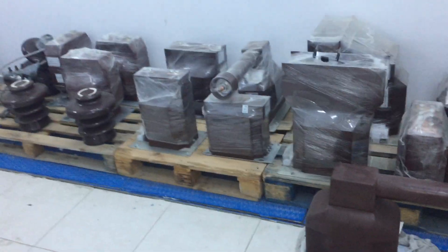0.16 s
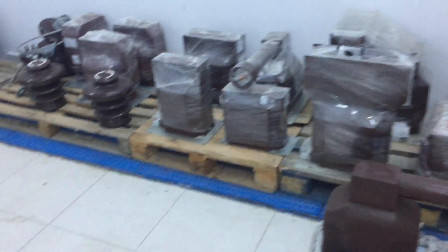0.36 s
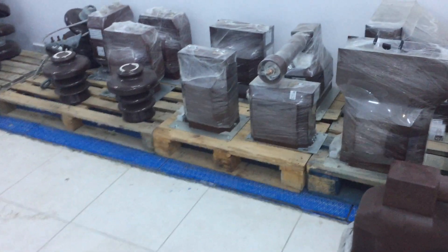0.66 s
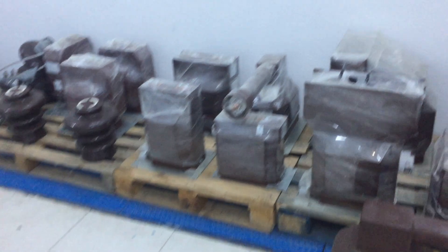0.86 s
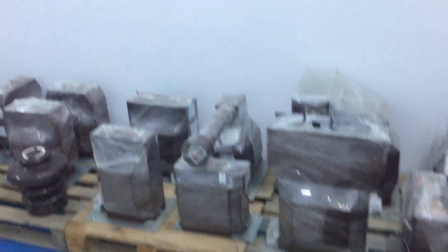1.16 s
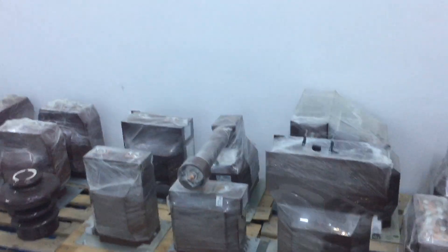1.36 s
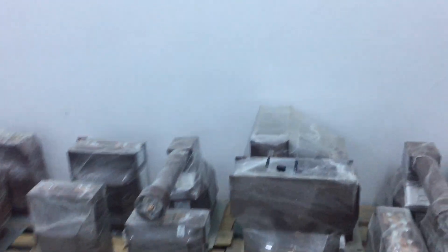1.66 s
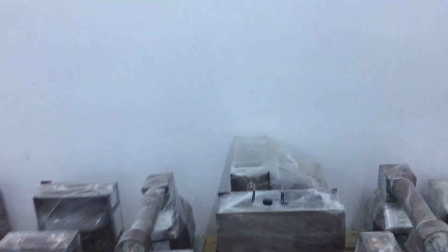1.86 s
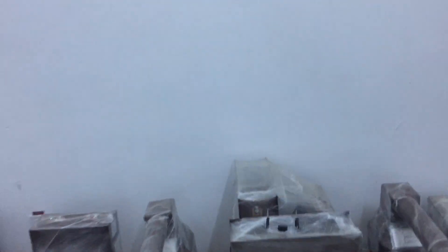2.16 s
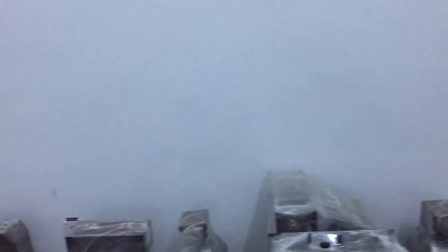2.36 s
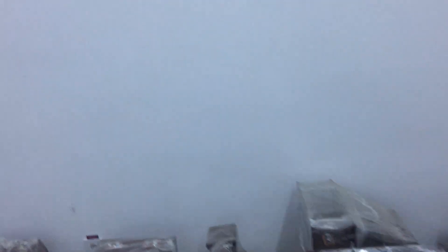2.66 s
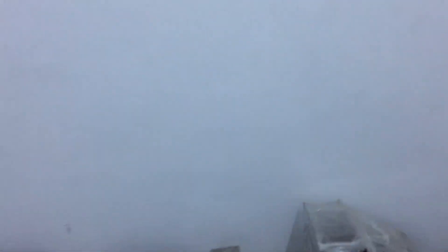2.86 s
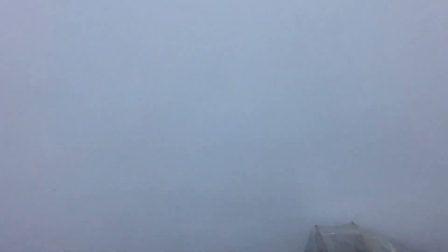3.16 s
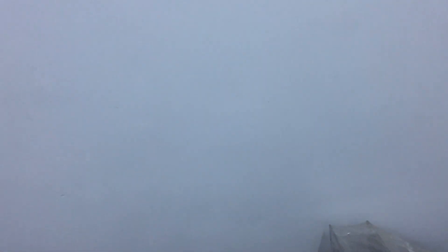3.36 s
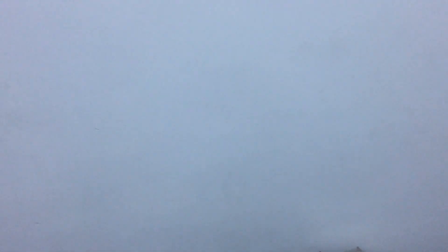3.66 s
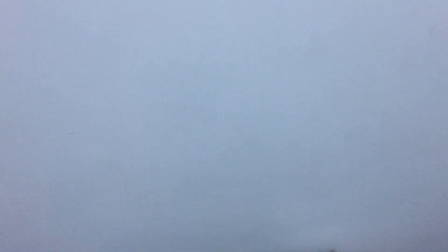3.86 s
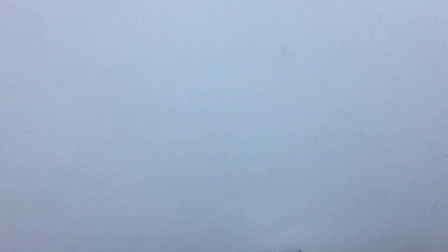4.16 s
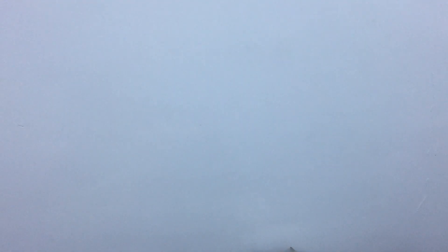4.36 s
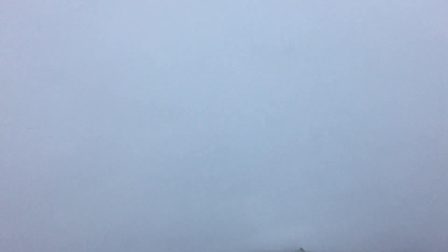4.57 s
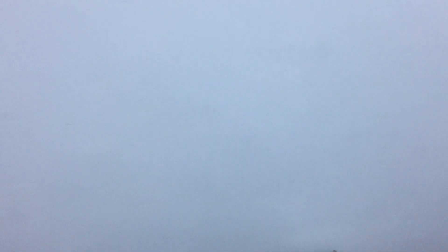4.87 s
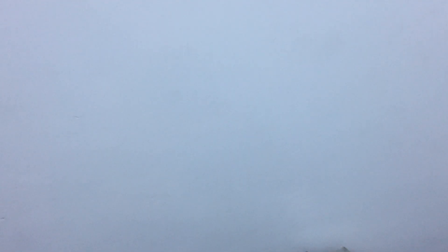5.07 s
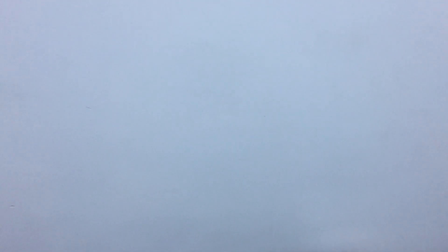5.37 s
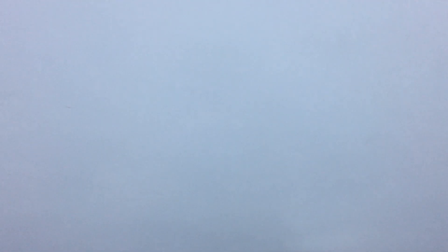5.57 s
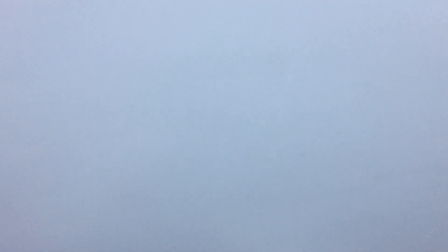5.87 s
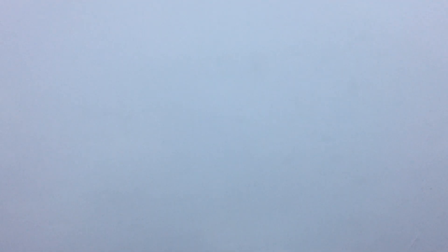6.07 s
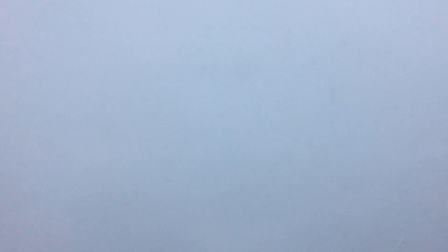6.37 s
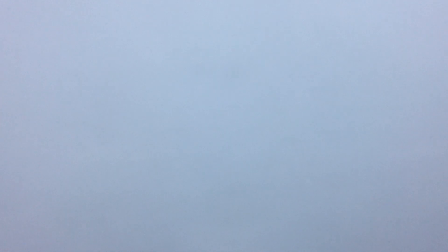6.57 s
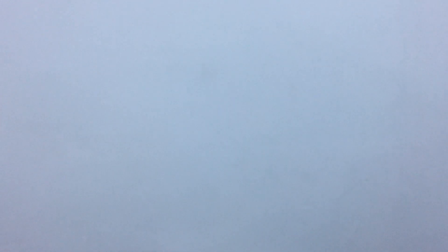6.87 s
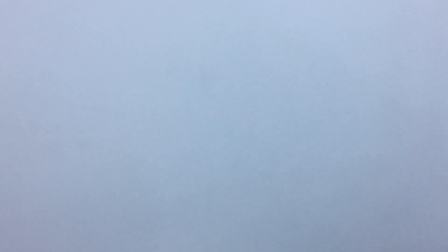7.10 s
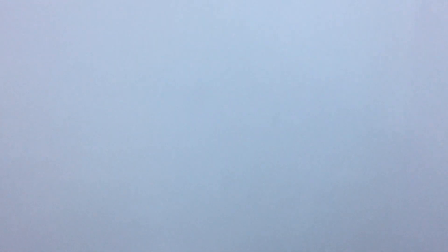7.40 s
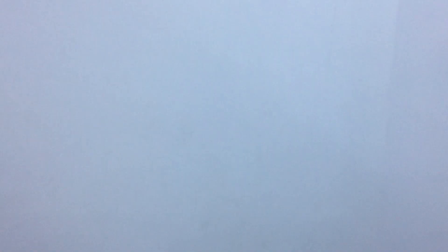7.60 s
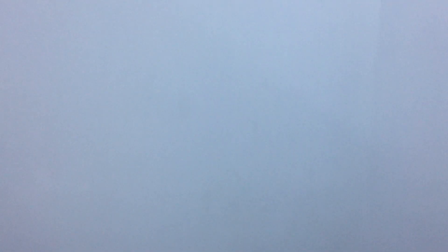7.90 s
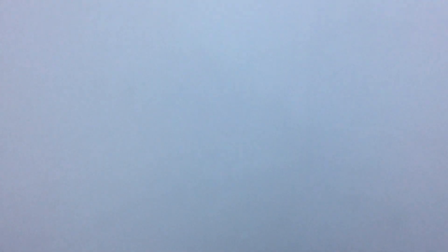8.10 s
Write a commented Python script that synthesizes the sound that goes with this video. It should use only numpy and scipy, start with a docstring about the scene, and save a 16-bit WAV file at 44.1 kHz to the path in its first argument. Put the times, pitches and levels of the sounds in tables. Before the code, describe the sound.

Steady electrical machinery hum with slowly swelling tones drones over low rumble and rushing cooling air in a bare, hard indoor room.

```python
"""A generator set turning about ten times a second hums in a bare, hard room of a power plant.
Sines at multiples of the shaft rate give its shaft orders, a 19-per-turn beat and the magnetic hum.
The hand-held microphone moves through the room's standing waves, so the tones swell and fade.
A wavering sine adds a low drone; a faint rubber squeak, noise scuffs and damped taps come from close by.
Behind them, coloured noise makes the room rumble, the rush of cooling air and a faint hiss."""
import sys
import numpy as np
from scipy import signal
from scipy.fft import rfft, irfft, next_fast_len
from scipy.io import wavfile
from scipy.ndimage import uniform_filter1d, map_coordinates

SR = 44100
rng = np.random.default_rng(int(sys.argv[2]) if len(sys.argv) > 2 else 0)


def master(y):
    """Save y as 16-bit WAV."""
    cut = np.clip(np.atleast_2d(y).T, -1, 1)
    pcm = np.round(cut * 32767)  # scale
    wavfile.write(sys.argv[1], SR, pcm.astype(np.int16))


N = 363384

SHAFT_HZ = 10.008
BEAT_PER_TURN = 19
SCUFF_RISE_S = .015
FADE_S = .002
TOP_HZ = 15740

# Microphone height. Each row: time in seconds, height from 0 (held low) to 1 (held high).
LIFT = [(0, 0.017), (2, 0.017), (3, 0.52), (4, 0.93), (5, 0.88), (8.24, 0.75)]
# Steady shaft orders, as multiples of the shaft rate.
STEADY_ORDERS = [3, 4, 5, 6, 7, 8, 10, 12, 13, 15, 17, 21, 24, 30, 40, 50, 60, 70]
# Their levels before sway. Each row, one per order: dB rms held low, dB rms held high.
STEADY_LEVELS = [(-74.5, -80), (-49.5, -48), (-60, -53.5), (-68.5, -59), (-45, -39), (-42, -50),
                 (-37.5, -46.5), (-64, -49.5), (-46.5, -55.5), (-54.5, -50.5), (-53.5, -51), (-44.5, -45),
                 (-55, -55), (-54, -53), (-58.5, -57), (-59, -61.5), (-61, -51.5), (-64.5, -65)]
# Swelling tones: the ninth order, the twentieth (the magnetic hum's octave), then the beat and its
# second, third and fourth harmonics. Each row: time in seconds, level in dB rms before sway.
NINTH = [(0, -37.5), (.3, -30.5), (.65, -52), (1, -32.5), (1.5, -40.5), (2.5, -40), (5, -46), (8.24, -48)]
HUM_OCTAVE = [(0, -44), (1.7, -37), (2.3, -44.5), (2.9, -55.5), (3.5, -40), (4.8, -38), (5.9, -44),
              (7.002, -37), (8.24, -37.5)]
BEAT_1ST = [(0, -32), (.5, -47), (1.4, -48.5), (2.3, -36.5), (3.4, -37.5), (4.5, -48.5), (5.1, -51),
            (5.8, -37), (6.5, -33.5), (7.1, -38.5), (7.55, -50), (7.85, -37.5), (8.24, -43)]
BEAT_2ND = [(0, -34), (.5, -31), (1, -28), (1.5, -31), (2.3, -29), (2.8, -26.5), (3.03, -28.5),
            (3.24, -33.5), (3.5, -31.5), (3.78, -41), (4, -37), (4.24, -31), (5.1, -29.5), (5.55, -32),
            (5.85, -36.5), (6.1, -47.5), (6.76, -45), (6.93, -33), (7.8, -27), (8.24, -28)]
BEAT_3RD = [(0, -36), (.32, -36), (.5, -46.5), (.68, -42), (.92, -37), (1.72, -34.5), (1.95, -41.5),
            (2.2, -54), (2.42, -41.5), (2.7, -43.5), (3, -42), (3.45, -60.5), (3.75, -50.5), (3.98, -54),
            (4.33, -41), (5.4, -41), (5.75, -53.5), (6.12, -38.5), (6.55, -39), (6.97, -52.5), (7.3, -39.5),
            (7.58, -37.5), (8.24, -50.5)]
BEAT_4TH = [(0, -51), (.2, -43.5), (.5, -50), (.76, -43.5), (1.12, -62.5), (1.52, -43), (1.8, -44),
            (2.05, -47.5), (2.55, -53), (3.1, -52), (3.33, -42.5), (3.7, -48), (4.1, -52), (4.4, -45.5),
            (4.9, -45), (5.35, -47.5), (6.2, -40.5), (6.6, -41), (7.2, -48), (7.45, -43.5), (7.85, -53.5),
            (8.24, -46.5)]
# Faint overtones of the beat, as multiples of it, and their levels in dB rms before sway.
BEAT_OVERTONES = [5, 6, 7, 8, 9, 10, 11, 17, 19]
BEAT_OVERTONE_LEVELS = [-55, -61, -70.5, -67, -67.5, -67, -72, -84.5, -91.5]
# Faint overtones of the magnetic hum, as multiples of the shaft rate, and levels in dB rms before sway.
HUM_OVERTONES = [80, 100, 130, 140]
HUM_OVERTONE_LEVELS = [-70.5, -67, -70.5, -66.5]
# Wavering low tone. Each row: time in seconds, level in dB rms before flutter.
DRONE = [(0, -54), (2.9, -52.5), (3.5, -37.5), (3.95, -38), (4.15, -46), (4.35, -34), (4.95, -42),
         (5.2, -32.5), (5.45, -42.5), (5.75, -34.5), (6.1, -47.5), (6.4, -37), (6.9, -46), (7.2, -37.5),
         (8.24, -47.5)]
# Rubber squeak. Each row: time in seconds, pitch in Hz, level in dB rms, both before roughness.
SQUEAK = [(1.29, 7300, -96), (1.303, 7350, -80), (1.345, 7380, -78), (1.37, 7270, -79), (1.41, 7220, -82),
          (1.425, 7200, -100)]
# Scuffs. Each row: start in seconds, hold in seconds (rise included), fade in seconds per 10 dB,
# level in dB rms.
SCUFFS = [(3.644, .056, .022, -67.5), (3.725, .03, .04, -79), (3.8, .05, .12, -84), (7.2, .12, .05, -83),
          (7.7, .05, .05, -86)]
# Tone colour of the scuffs. Each row: frequency in Hz, relative level in dB.
SCUFF_COLOUR = [(2500, -12), (4000, 6), (5500, 1), (9000, -1), (10400, -8), (11500, -3), (16500, -6)]
# A dull knock and two tiny ticks. Each row: start in seconds, pitch in Hz, time to fall 60 dB in seconds,
# attack time constant in seconds, starting gain in dB before the attack softens it.
TAPS = [(.0758, 555, .35, .02, -26), (4.3975, 13000, .003, .0002, -56), (4.4065, 12600, .003, .0002, -65)]
# Noise spectra before air() trims them. Each row: frequency in Hz, density in dB per Hz.
# In turn: rumble held low, rumble held high, cooling air through the walls, top end and microphone noise.
RUMBLE_LOW = [(22, -95), (45, -77.5), (85, -64), (100, -57), (112, -60), (135, -60.5), (180, -57.5),
              (215, -54.5), (230, -57.5), (270, -65), (330, -59.5), (355, -54.5), (420, -66), (500, -67)]
RUMBLE_HIGH = [(22, -94), (45, -77.5), (85, -71), (100, -52.5), (112, -57.5), (135, -58), (180, -58.5),
               (215, -58.5), (230, -60.5), (270, -62.5), (330, -60.5), (350, -55.5), (420, -65.5),
               (500, -69)]
RUSH = [(500, -68), (950, -68.5), (1250, -72.5), (1700, -75.5), (1850, -80.5), (2270, -81), (2500, -87.5),
        (2800, -86), (3000, -94), (3300, -89.5), (3420, -91), (3520, -97), (3980, -97), (4100, -103)]
HISS = [(4100, -103), (4300, -105.5), (4500, -104.5), (4850, -114), (5200, -112), (6200, -114.7),
        (7000, -117.7), (7600, -120.6), (8600, -118.4), (9800, -121.6), (10400, -126), (11000, -122.8),
        (13000, -123.5), (16500, -127)]


def amp(db):
    """Decibels to gain."""
    return 10 ** (np.asarray(db) / 20)


def unit(x):
    """Scale x to rms 1."""
    return x / np.sqrt(np.mean(x ** 2) + 1e-20)


def curves(rows):
    """Draw straight lines through the rows: one curve for each column after the time."""
    times, *columns = np.transpose(rows)
    return [np.interp(np.arange(N) / SR, times, column) for column in columns]


def wobble(rate):
    """A random curve of straight lines between normal random knots, rate knots a second."""
    knots = rng.standard_normal(int(N * rate / SR) + 4)
    return map_coordinates(knots, [np.arange(N) * rate / SR], order=1)


def sine(turns, level_db):
    """A sine from its phase in turns, at a level in dB rms."""
    return np.sqrt(2) * amp(level_db) * np.sin(2 * np.pi * turns)


def filtered(x, response):
    """Multiply the spectrum of x by a response of frequency."""
    size = next_fast_len(N + 8192)
    spectrum = rfft(x, size) * response(np.fft.rfftfreq(size, 1 / SR))
    return irfft(spectrum, size)[..., :N]


def coloured(x, spectrum):
    """Bring white noise x of rms 1 to a density in dB per Hz, silent outside the spectrum's range."""
    freqs, levels = np.transpose(spectrum)

    def gain(hz):
        return amp(np.interp(np.log(hz + 1), np.log(freqs + 1), levels, left=-300, right=-300))

    # White noise of rms 1 spreads its power over SR / 2 Hz.
    return np.sqrt(SR / 2) * filtered(x, gain)


def patchy(depth_db):
    """White noise whose loudness drifts in patches of time and pitch."""
    grid = signal.stft(rng.standard_normal(N), nperseg=1024)[2]
    field = rng.standard_normal(grid.shape)
    field = uniform_filter1d(field, size=8, axis=0)  # blur over pitch
    field = uniform_filter1d(field, size=10, axis=1)  # blur over time
    noise = signal.istft(grid * amp(depth_db * unit(field)), nperseg=1024)[1]
    return unit(noise[:N])


def tone(order, level_db, sway_db, sway_turns, start_turns):
    """One shaft order; small moves in the standing waves sway its level and phase."""
    turns = order * SHAFT_HZ * np.arange(N) / SR + start_turns + sway_turns * wobble(2)
    return sine(turns, level_db + sway_db * wobble(2))


def spread(order):
    """Starting phase in turns: the orders arrive spread over the turn, so they hum rather than throb."""
    return .17 * order * order


def steady_orders(lift):
    """Shaft orders whose level follows microphone height; short waves sway more than long ones."""
    mix = np.zeros(N)
    for order, (low_db, high_db) in zip(STEADY_ORDERS, STEADY_LEVELS):
        level_db = low_db + (high_db - low_db) * lift
        mix += tone(order, level_db, sway_db=0.12 * order ** .8, sway_turns=.0015 * order,
                    start_turns=spread(order))
    return mix


def swelling_orders():
    """Ninth order, hum octave and beat harmonics, swelling and fading in the standing waves."""
    orders = [9, 20] + [BEAT_PER_TURN * k for k in (1, 2, 3, 4)]
    levels = [NINTH, HUM_OCTAVE, BEAT_1ST, BEAT_2ND, BEAT_3RD, BEAT_4TH]
    mix = np.zeros(N)
    for order, rows in zip(orders, levels):
        mix += tone(order, curves(rows)[0], sway_db=0.2, sway_turns=.0015 * order,
                    start_turns=spread(order))
    return mix


def faint_overtones():
    """High overtones of the beat and the magnetic hum, swaying widely from random starting phases."""
    orders = [BEAT_PER_TURN * k for k in BEAT_OVERTONES] + HUM_OVERTONES
    levels = BEAT_OVERTONE_LEVELS + HUM_OVERTONE_LEVELS
    mix = np.zeros(N)
    for order, level_db in zip(orders, levels):
        mix += tone(order, level_db, sway_db=4.0, sway_turns=0.28, start_turns=rng.random())
    return mix


def machine(lift):
    """The generator set: every tone is tuned to a whole multiple of the shaft rate."""
    return steady_orders(lift) + swelling_orders() + faint_overtones()


def drone(centre_hz=144.7, wander_hz=.8, flutter_db=1.5):
    """A low tone not locked to the shaft; it wanders a little in pitch and flutters in level."""
    turns = np.cumsum(centre_hz + wander_hz * wobble(3)) / SR
    return sine(turns, curves(DRONE)[0] + flutter_db * wobble(4.6))


def squeak():
    """A thin whistle of slipping rubber, roughened by fast random moves of pitch and level."""
    hz, level_db = curves(SQUEAK)
    turns = np.cumsum(hz + 110 * wobble(300)) / SR
    return sine(turns, level_db + 2.5 * wobble(160))


def scuffs():
    """Short bright noise brushes near the microphone: a soft rise, a grainy hold, then a fade."""
    t = np.arange(N) / SR
    shape = np.zeros(N)
    for start, hold, fade, level_db in SCUFFS:
        rise = np.clip((t - start) / SCUFF_RISE_S, 0, 1)
        drop_db = 10 * np.clip(t - start - hold, 0, None) / fade
        shape += amp(level_db - drop_db) * rise
    grains = amp(1.6 * wobble(150)) * rng.standard_normal(N)
    return shape * unit(coloured(grains, SCUFF_COLOUR))


def taps():
    """Each tap rings one damped mode: a sine with a quick attack and an exponential decay."""
    mix = np.zeros(N)
    for start, hz, t60, attack, level_db in TAPS:
        t = np.clip(np.arange(N) / SR - start, 0, None)
        decay = amp(level_db - 60 * t / t60)
        mix += decay * (1 - np.exp(-t / attack)) * np.sin(2 * np.pi * hz * t)
    return mix


def air(lift):
    """Noise in the room's modes rumbles, changing with microphone height, under air rush and hiss."""
    push = patchy(depth_db=1.0)
    rumble = (1 - lift) * coloured(push, RUMBLE_LOW) + lift * coloured(push, RUMBLE_HIGH)
    rush = amp(0.09 * wobble(1.5)) * coloured(patchy(depth_db=1.0), RUSH)
    hiss = coloured(patchy(depth_db=1.8), HISS)
    return amp(0.5) * (rumble + rush + hiss)  # trim all three up by 0.5 dB


def scene():
    """Mix machine, drone, small near sounds and air into one channel."""
    lift = np.clip(curves(LIFT)[0], 0, 1)
    near = squeak() + scuffs() + taps()
    return (machine(lift) + drone() + near + air(lift))[None]


def record(dry):
    """Short fades at both ends avoid clicks; a steep filter removes everything above TOP_HZ."""
    t = np.arange(N) / SR
    edges = np.clip(np.minimum(t, t[::-1]) / FADE_S, 0, 1)
    steep = signal.ellip(12, .05, 60, TOP_HZ, fs=SR, output="sos")
    return signal.sosfiltfilt(steep, dry * edges)


dry = scene()
out = record(dry)
master(out)
```